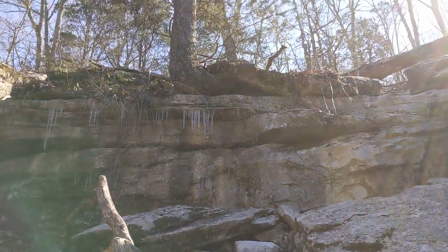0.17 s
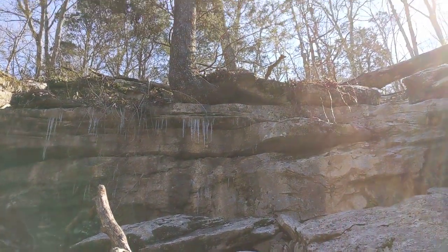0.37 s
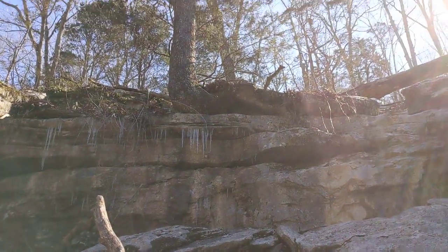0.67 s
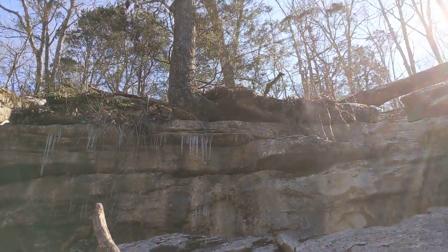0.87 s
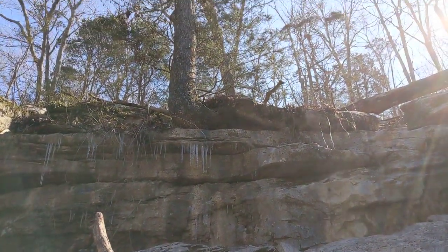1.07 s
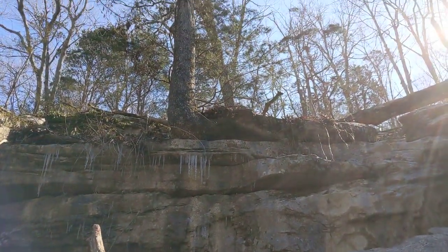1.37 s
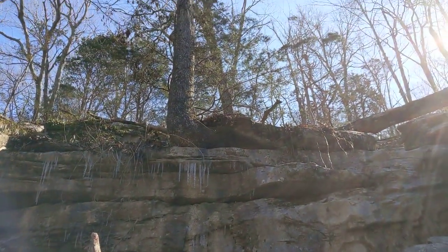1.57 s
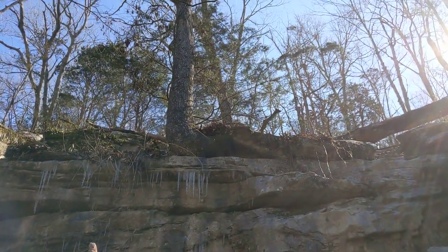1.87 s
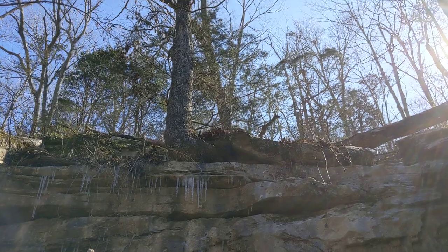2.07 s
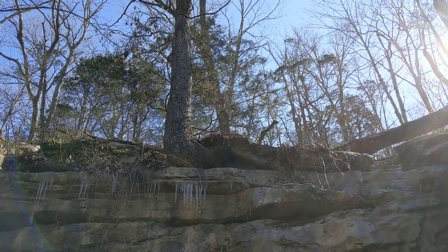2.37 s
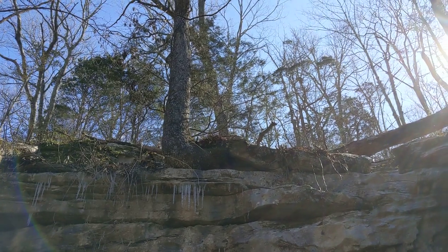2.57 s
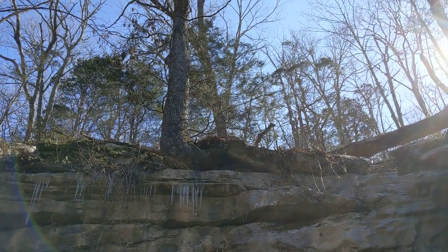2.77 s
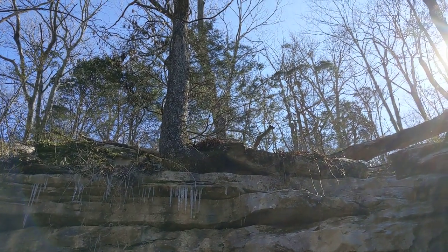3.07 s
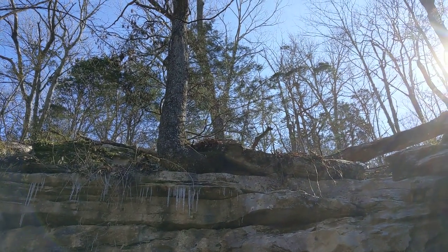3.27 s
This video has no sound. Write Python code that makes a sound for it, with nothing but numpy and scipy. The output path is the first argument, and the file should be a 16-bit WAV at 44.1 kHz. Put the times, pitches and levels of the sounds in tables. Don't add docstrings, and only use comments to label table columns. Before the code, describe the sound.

Meltwater drips tick quickly and irregularly on a rock ledge, with plinks, wind thumps and rumble.

```python
import sys
import numpy as np
from scipy import signal
from scipy.fft import rfft, irfft, next_fast_len
from scipy.io import wavfile
from scipy.ndimage import uniform_filter1d, minimum_filter1d, map_coordinates

SR = 44100
rng = np.random.default_rng(int(sys.argv[2]) if len(sys.argv) > 2 else 0)


def dump(signal):
    limited = np.clip(np.atleast_2d(signal).T, -1, 1)
    pcm = np.round(limited * 32767).astype(np.int16)
    wavfile.write(sys.argv[1], SR, pcm)


def rack_gain(trim_db):
    fader = np.asarray(trim_db, float)
    return 10 ** (fader / 20)


N = 150381

# t/s, peak level/dB, f/Hz
STONE_EARLY = [(0.0022, -32.5, 11300), (0.0416, -30, 12600), (0.1017, -30, 14600), (0.1148, -42, 14600),
               (0.1473, -32, 10400), (0.2037, -33, 11900), (0.231, -23, 13700), (0.2682, -32, 15000),
               (0.3049, -26.5, 11700), (0.3374, -30.5, 12300), (0.4314, -34, 15000), (0.4591, -28, 10900),
               (0.4942, -33, 13700), (0.5567, -29.5, 12500), (0.5791, -31, 11600), (0.7444, -23, 11700),
               (0.7719, -30, 11800), (0.7946, -29.5, 12300), (0.8426, -26, 15200), (0.8553, -25, 11500),
               (0.9271, -33.5, 11600), (0.9864, -27.5, 11500), (1.0446, -35, 15700), (1.0858, -26.5, 13600),
               (1.1511, -33, 11700), (1.1671, -22.5, 15100), (1.2438, -29, 12500), (1.3063, -39, 12400),
               (1.3306, -26, 10600)]
STONE_MIDDLE = [(1.393, -28.5, 12500), (1.4009, -32, 11600), (1.4188, -32, 13800), (1.4551, -29.5, 11600),
                (1.5386, -27, 13100), (1.5805, -28, 11000), (1.7037, -29, 13700), (1.7192, -30.5, 11500),
                (1.7474, -34, 11400), (1.7793, -36, 12500), (1.8639, -29, 10500), (1.9084, -26, 9500),
                (1.9488, -31, 13600), (1.9639, -30.5, 12000), (1.9789, -27, 14000), (2.0263, -28.5, 10600),
                (2.0382, -31.5, 11000), (2.0901, -29, 13000), (2.1015, -26, 13400), (2.1574, -35, 10400),
                (2.1947, -28, 10600), (2.2334, -29, 12900), (2.251, -27, 14500), (2.3052, -24, 10900),
                (2.3403, -27.5, 12900), (2.372, -33, 12800), (2.3832, -35, 13100)]
STONE_LATE = [(2.4003, -25.5, 10500), (2.4672, -30.5, 14400), (2.4861, -32, 11700), (2.4973, -29, 9500),
              (2.5623, -40, 14000), (2.5977, -31, 14500), (2.6624, -29, 12700), (2.6722, -25.5, 12500),
              (2.6965, -32.5, 13800), (2.7251, -24, 13800), (2.7376, -26.5, 13700), (2.7784, -27, 13000),
              (2.803, -31.5, 10200), (2.8547, -23, 12500), (2.9476, -32, 10700), (2.9663, -24.5, 13500),
              (3.0145, -27.5, 12900), (3.0562, -31, 13700), (3.0722, -29, 8900), (3.0958, -26, 14400),
              (3.1156, -27.5, 13700), (3.1353, -30, 13200), (3.1623, -26, 13600), (3.222, -30, 14400),
              (3.2736, -25.5, 14700), (3.2805, -33.5, 9800), (3.2882, -30, 13200), (3.3301, -32.5, 12000),
              (3.3697, -29.5, 12500)]
# t/s, peak level/dB, f/Hz
STONE_SOFT = [(0.0225, -36, 15100), (0.0712, -40, 14800), (0.1636, -31.5, 10600), (0.2831, -39, 10700),
              (0.326, -35, 11600), (0.4713, -36, 11500), (0.49, -27, 13500), (0.532, -49, 10300),
              (0.5365, -39, 10700), (0.5444, -37, 15000), (0.599, -30, 12600), (0.6359, -32, 12500),
              (0.656, -26, 15000), (0.702, -39, 15000), (0.807, -28, 12500), (0.874, -41, 12500),
              (0.8998, -37, 11800), (0.92, -48, 12500), (0.955, -30, 12500), (1.1265, -41, 10000),
              (1.1973, -26, 11200), (1.2202, -43, 15300), (1.294, -44, 13400), (1.301, -31, 12200),
              (1.463, -33, 13500), (1.5667, -29, 12100), (1.608, -38, 12500), (1.6245, -35, 14400),
              (1.6445, -44, 12700), (1.691, -28, 12500), (1.7584, -31, 12500), (1.92, -32, 12700),
              (2.0037, -34, 11300), (2.0637, -31, 12900), (2.2818, -26.5, 13600), (2.3958, -23, 13500),
              (2.4265, -40, 14400), (2.4416, -32, 9900), (2.6249, -40, 10100), (2.7964, -32, 13500),
              (2.922, -31, 12400), (2.983, -30, 14100), (3.153, -33, 13500), (3.1801, -28, 12500),
              (3.2, -28, 10700), (3.361, -36, 13100)]
# t/s, peak level/dB, f/Hz
PUDDLE_DROPS = [(0.5788, -32, 4640), (0.661, -40, 2870), (0.7715, -32.5, 6700), (0.9009, -37, 5900),
                (0.9263, -35, 5270), (0.986, -31, 4750), (1.2442, -32, 6250), (1.4182, -41.5, 3500),
                (1.7808, -36, 5100), (1.8637, -22.5, 5040), (2.082, -33, 5260), (2.1009, -28, 4860),
                (2.1565, -45, 3950), (2.1938, -29.5, 3390), (2.2328, -31, 4620), (2.376, -46.5, 3740),
                (2.4007, -32, 7400), (2.4953, -45, 3400), (2.5616, -33.5, 5300), (2.7372, -29.5, 7900),
                (2.7776, -38, 6400), (2.908, -41, 4000), (2.9657, -30.5, 6900), (3.0143, -25, 4680),
                (3.055, -39, 6000), (3.1996, -33.5, 6900), (3.3147, -34, 5740)]
# t/s, peak level/dB, f/Hz
MORE_PUDDLE_DROPS = [
    (.008, -45, 2400),
    (.132, -50.5, 3700),
    (0.801, -44.5, 3900),
    (1.765, -39.5, 830),
    (1.006, -34.5, 6600),
    (2.514, -36.5, 6300),
    (2.58, -49, 4500),
    (1.6, -39, 1900),
    (2.935, -40, 5800),
    (2.8, -29, 6400),
]
# t/s, peak level/dB, f/Hz, T60/s
BUBBLE_TONES = [(.6615, -38, 2100, 0.057), (0.6613, -59, 3660, 0.092), (1.418, -39, 2300, 0.069),
                (1.8642, -22.5, 4380, 0.028), (1.8634, -20.5, 5210, 0.0098), (2.1942, -39.5, 3680, 0.038),
                (2.2331, -23.5, 4940, 0.015), (3.0135, -28.5, 4310, 0.026), (3.0143, -25, 5280, 0.011),
                (3.058, -38, 6070, .05), (.9015, -40, 5700, .03), (1.2436, -33, 5900, .03),
                (2.58, -47.5, 3720, 0.032), (2.1017, -41, 5000, 0.015)]
# f/Hz, level/dB
LEFT_PORT = [(2500, 4.5), (4500, 2), (7700, -5), (10000, -7), (15000, -18)]
# f/Hz, level/dB
RIGHT_PORT = [(5000, 2), (7700, 0), (9500, 3.5)]
# f/Hz, level/dB
WATER_TOP = [(15850, 0), (16000, -33)]
# t/s, level/dB
WIND_LEVEL = [
    (0, -34.5),
    (.3, -34),
    (.55, -32),
    (.65, -48),
    (.95, -36),
    (1.1, -26.5),
    (1.35, -35.5),
    (1.6, -40.5),
    (1.75, -43),
]
# f/Hz, level/dB (per Hz)
WIND_SPECTRUM = [(18, -14), (28, 7), (60, 1), (140, -20.5), (300, -66)]
# t/s, peak level/dB, thump f/Hz, port (0 left, 1 right)
WIND_PUFFS = [
    (.17, -24.5, 39, 0),
    (0.199, -21.5, 45.4, 1),
    (0.357, -30, 40, 1),
    (0.501, -22, 33, 1),
    (0.696, -16, 63, 1),
    (0.775, -24, 59, 1),
    (0.908, -21, 47, 0),
    (1.283, -17.5, 46.2, 1),
    (1.594, -20, 43.3, 0),
]
# f/Hz, level/dB (per Hz)
RUMBLE_SPECTRUM = [(15, -67), (25, -2), (76, 1.5), (124, -2.5), (161, -9.5), (286, -14.5), (457, -20),
                   (614, -16.5), (1600, -32.5), (2080, -36), (3520, -120)]
# f/Hz, left-right correlation
RUMBLE_COHERENCE = [(50, 1), (150, 0.95), (380, 0.67), (700, 0.14), (1300, 0)]
# t/s, level/dB
RUMBLE_SWELL = [(0, 0), (1.2, -1), (3.4, 1)]
# f/Hz, level/dB (per Hz)
HISS_SPECTRUM = [(800, -52), (1400, 1.5), (3000, 3.5), (7000, 0.5), (12000, -6.5), (15900, -7)]
# f/Hz, level/dB
HISS_BALANCE = [(2000, 3), (9000, 2.5)]

PORT_LAGS = [11, 0]
STEADY_TOP_HZ = 15950


def unit(x):
    return x / np.sqrt(np.mean(x ** 2) + 1e-20)


def along(points, hz):
    f, v = np.transpose(points)
    return np.interp(np.log(hz + 1), np.log(f + 1), v)


def wobble(rate):
    knots = rng.standard_normal(int(N * rate / SR) + 4)
    return map_coordinates(knots, [np.arange(N) * rate / SR])


def filtered(x, response):
    m = next_fast_len(N + 8192)
    return irfft(rfft(x, m) * response(np.fft.rfftfreq(m, 1 / SR)), m)[..., :N]


def drops(s, db, hz, cycles, crack_db, echo_db, t60, far_db=0):
    size = 4096
    t, f = np.arange(size) / SR, np.fft.rfftfreq(size, 1 / SR)
    early = rack_gain(echo_db - 60 * t / t60)
    late = rack_gain(-20 + far_db - 60 * t / 0.11)

    chance = rng.standard_normal((len(s), 4, size))
    scatter = chance[:, :2] * np.abs(chance[:, 2:]) * (t < .08)
    scatter = scatter * np.linalg.norm(early) / np.linalg.norm(scatter * early, axis=2, keepdims=True)
    scatter[:, :, 0] = 1 / early[0]

    pitch = np.asarray(hz)[:, None, None]
    width = pitch / cycles
    ring = (1j * f * width / (pitch * pitch - f * f + 1j * f * width)) ** 2
    edge = 0.66 * pitch
    crack = rack_gain(crack_db) * f * f / (edge * edge - f * f + 1j * f * edge)
    crack = crack / (1 + 1j * f / (2 * pitch))

    ringing = rfft(scatter * (early + late)) * ring
    cracking = rfft(scatter * early * rack_gain(-60 * t / 0.37)) * crack
    shape = irfft(ringing + cracking, size)
    level = rack_gain(db + 14.0)[:, None, None]
    shape = shape / np.linalg.norm(shape, axis=2, keepdims=True) * level

    at = np.round(np.asarray(s) * SR).astype(int)[:, None] + np.arange(size)
    ports = []
    for k, lag in enumerate(PORT_LAGS):
        ports.append(np.bincount((at + lag).ravel(), shape[:, k].ravel(), N + 2 * size)[:N])
    return np.array(ports)


def splats():
    soft = [(s + .001, db - 4, hz) for s, db, hz in STONE_SOFT]
    s, db, hz = np.transpose(list(STONE_EARLY) + list(STONE_MIDDLE) + list(STONE_LATE) + soft)
    return drops(s, db + 2.0, hz, cycles=2.67, crack_db=-12, echo_db=-9.5, t60=0.028)


def plinks():
    s, db, hz = np.transpose(list(PUDDLE_DROPS) + list(MORE_PUDDLE_DROPS))
    return drops(s + 0.00059, db + 2.5, hz, cycles=3.9, crack_db=-14.5, echo_db=-15.5, t60=.022, far_db=-7)


def bubbles():
    out, t = np.zeros((2, N + SR)), np.arange(SR // 8) / SR
    flutter_db = 4
    flutter = rack_gain(flutter_db * np.array([wobble(340), wobble(300)]))
    for s, db, hz, t60 in BUBBLE_TONES:
        attack = 1 - np.exp(-t / 0.00041)
        tone = rack_gain(db - 60 * t / t60) * attack * np.sin(2 * np.pi * hz * t)
        for k, lag in enumerate(PORT_LAGS):
            out[k, round(s * SR) + lag:][:len(t)] += tone
    return out[:, :N] * flutter


def patter():
    drops_per_s, centre_hz, floor_db, spread_db = 220, 12500, -45, 1.5
    u = rng.random((int(drops_per_s * N / SR), 3))
    hz = np.clip(centre_hz * np.exp(0.5 * (u[:, 1] - .5)), 2000, 16000)
    db = floor_db - spread_db * np.log(1 - u[:, 2]).clip(-2)
    return drops(u[:, 0] * N / SR, db, hz, cycles=3.3, crack_db=-10.5, echo_db=-11, t60=0.066)


def rush(spectrum, alike):
    def shares(hz):
        angle = np.arccos(np.clip(along(alike, hz), -1, 1)) / 2
        return rack_gain(along(spectrum, hz)) * [np.cos(angle), np.sin(angle)]

    mid, side = filtered(rng.standard_normal((2, N)), shares)
    return unit(np.array([mid + side, mid - side]))


def wind():
    t = np.arange(N) / SR
    lumps = rack_gain(3.6 * np.array([wobble(8.83), wobble(9.17)]))
    level_db = np.interp(t, *np.transpose(WIND_LEVEL)) + [[-6], [0]]
    out = rack_gain(level_db) * unit(lumps * rush(WIND_SPECTRUM, [(30, 0.1)]))
    for s, db, hz, port in WIND_PUFFS:
        envelope = np.exp(-((t - s) * hz / 0.53) ** 2 / 2)
        out[round(port)] -= rack_gain(db) * envelope * np.cos(2 * np.pi * hz * (t - s))
    return out


def background():
    swell_db = np.interp(np.arange(N) / SR, *np.transpose(RUMBLE_SWELL))
    rumble = rack_gain(-39.5 - 0.5 + swell_db) * rush(RUMBLE_SPECTRUM, RUMBLE_COHERENCE)
    hiss = rush(HISS_SPECTRUM, [(1000, 0.055)])
    hiss = filtered(hiss, lambda hz: rack_gain([along(HISS_BALANCE, hz), 0 * hz]))
    return rumble + rack_gain(-57.5) * hiss


def scene():
    def steady(hz):
        return hz < STEADY_TOP_HZ

    def ports(hz):
        return rack_gain([along(LEFT_PORT, hz), along(RIGHT_PORT, hz)] + along(WATER_TOP, hz))

    water = splats() + plinks() + filtered(patter(), steady) + bubbles()
    return filtered(water, ports) + wind() + filtered(background(), steady)


def gated(x):
    low_hz, high_hz, reach_s = 2800, 9500, .035
    tick_db, patch_db = 12, -1
    hz, t, z = signal.stft(x, SR, nperseg=256)
    power = np.abs(z) ** 2
    treble = power[:, hz > high_hz].mean(axis=(0, 1))
    peak = -minimum_filter1d(-treble, size=round(reach_s / t[1]))
    near = peak > np.median(treble) * rack_gain(2 * tick_db)
    patch = uniform_filter1d(power.mean(axis=0), size=3, axis=0)
    patch = uniform_filter1d(patch, size=3, axis=1)
    weak = patch < np.median(patch, axis=1, keepdims=True) * rack_gain(2 * patch_db)
    inside = (hz > low_hz) & (hz < high_hz)
    return signal.istft(z * ~(weak & near & inside[:, None]), SR, nperseg=256)[1][:, :N]


def roll_off(x):
    return signal.sosfilt(signal.butter(12, 16960, fs=SR, output="sos"), x)


def record(dry):
    mix = gated(filtered(dry, lambda hz: (hz < 16900) * (hz > 15)))
    return roll_off(mix)


dry = scene()
out = record(dry)
dump(out)
```